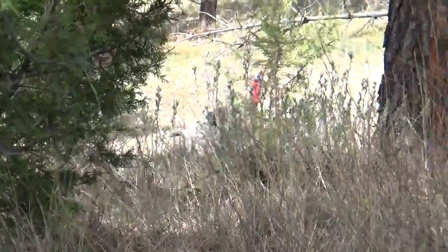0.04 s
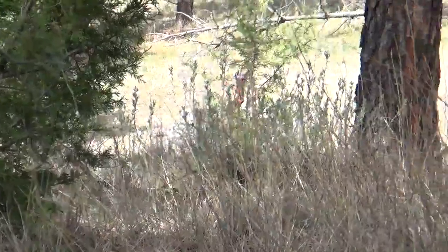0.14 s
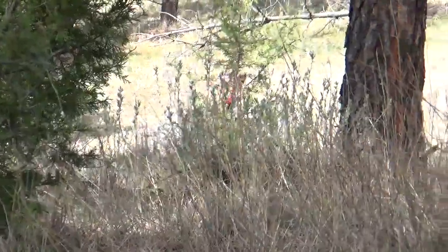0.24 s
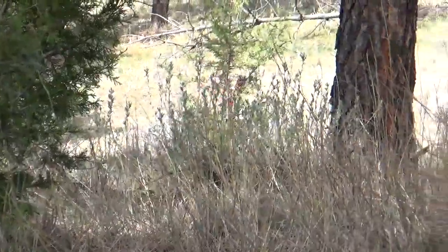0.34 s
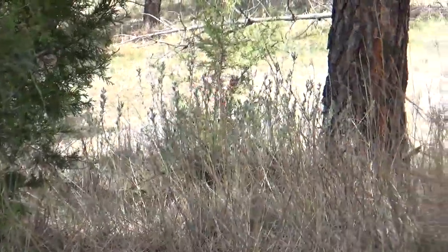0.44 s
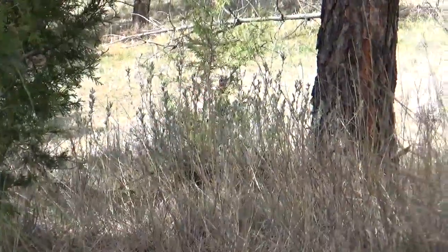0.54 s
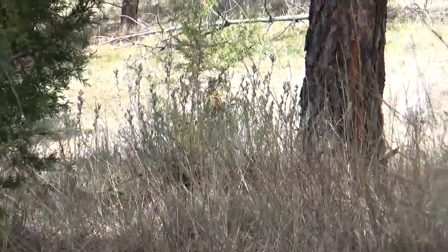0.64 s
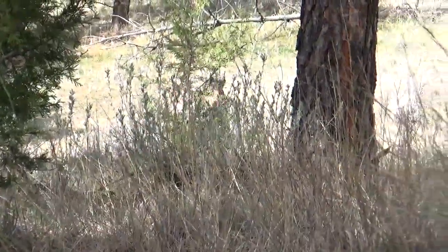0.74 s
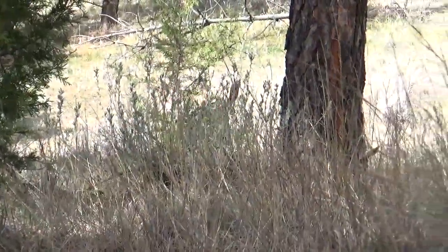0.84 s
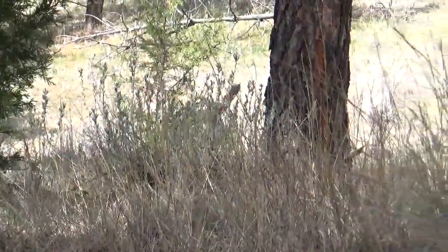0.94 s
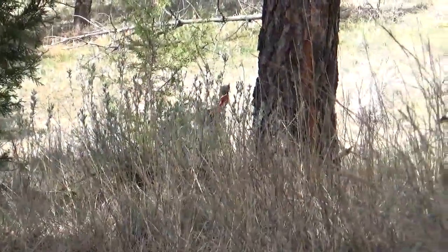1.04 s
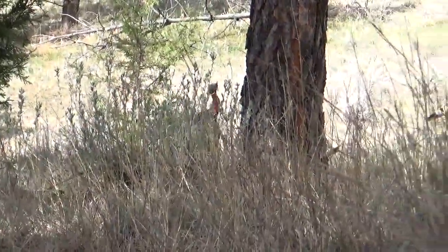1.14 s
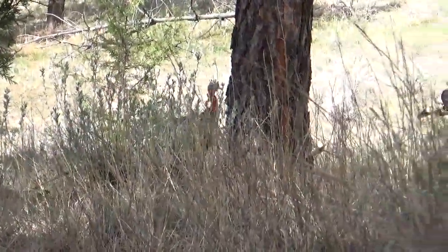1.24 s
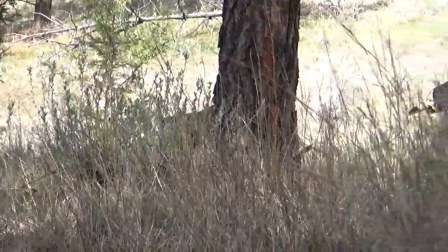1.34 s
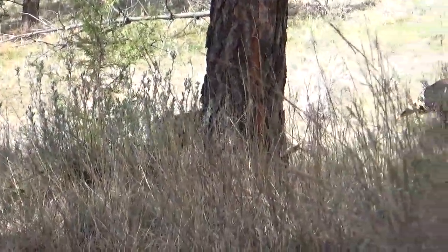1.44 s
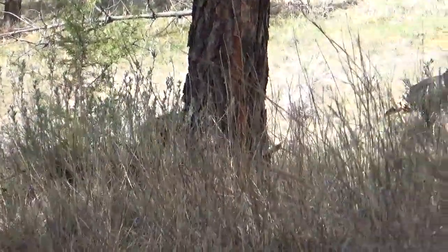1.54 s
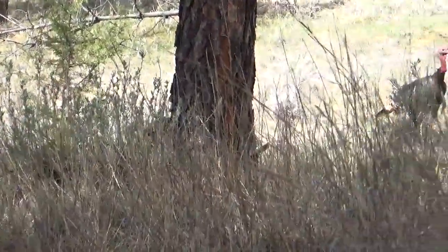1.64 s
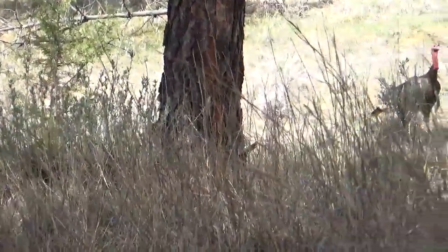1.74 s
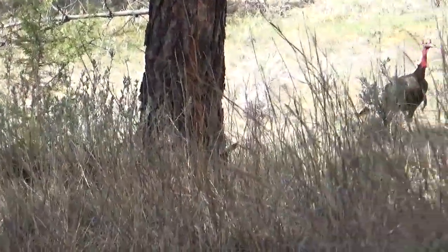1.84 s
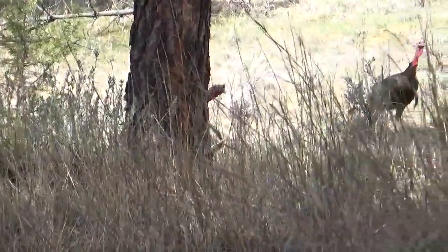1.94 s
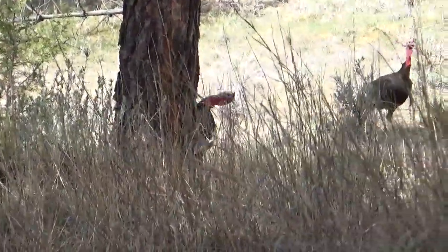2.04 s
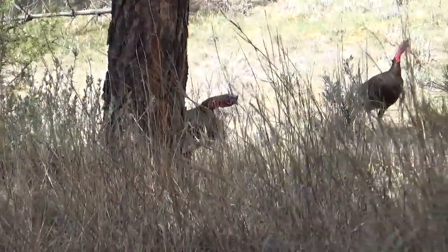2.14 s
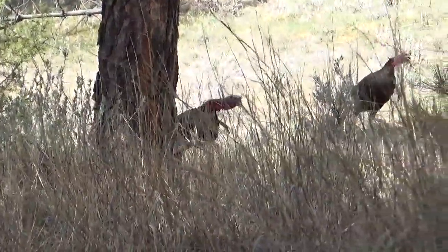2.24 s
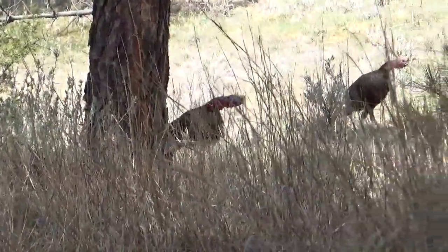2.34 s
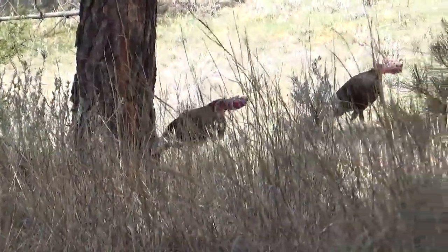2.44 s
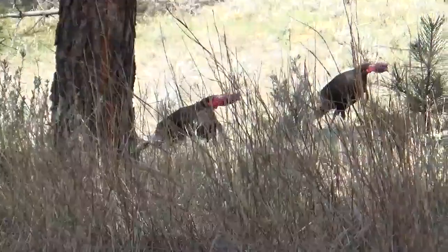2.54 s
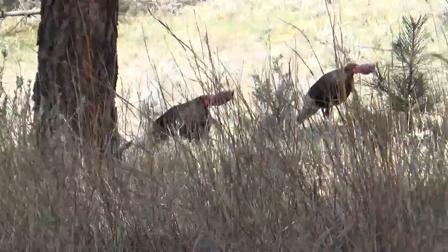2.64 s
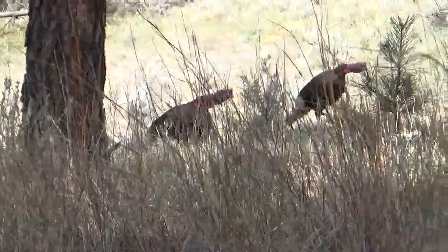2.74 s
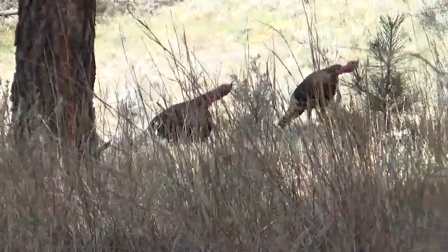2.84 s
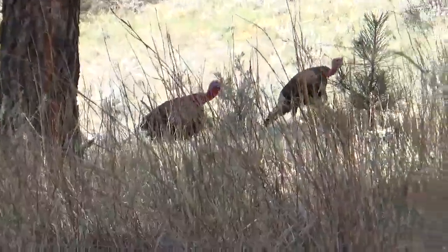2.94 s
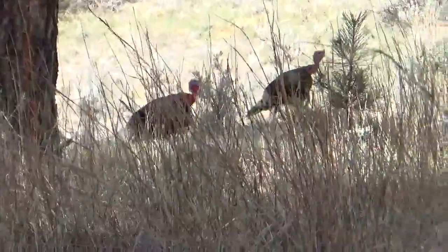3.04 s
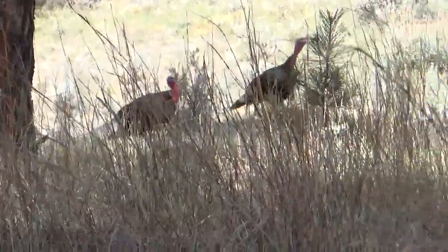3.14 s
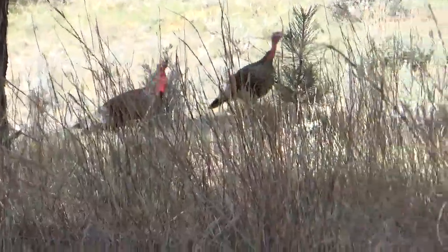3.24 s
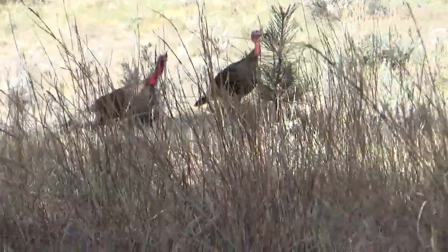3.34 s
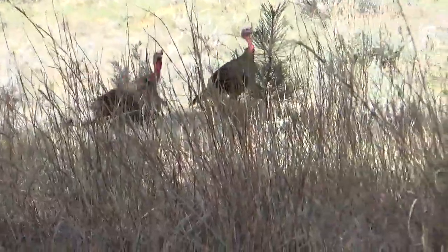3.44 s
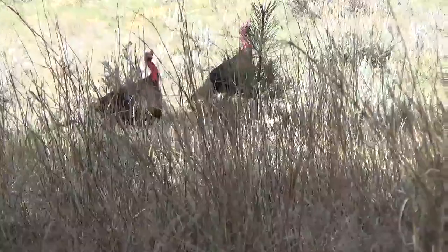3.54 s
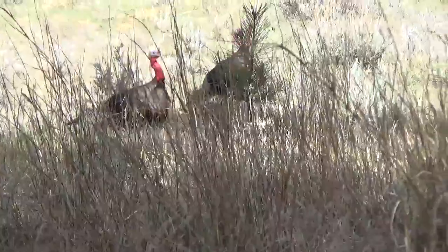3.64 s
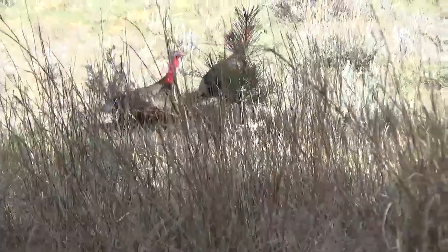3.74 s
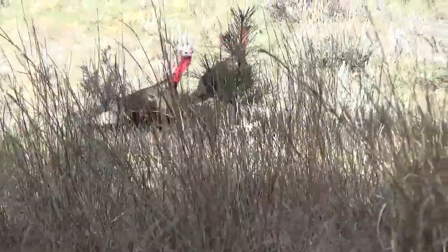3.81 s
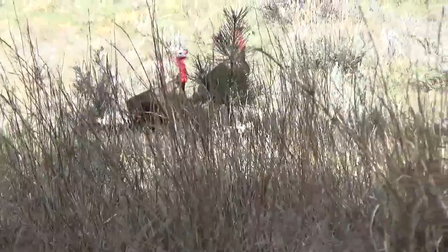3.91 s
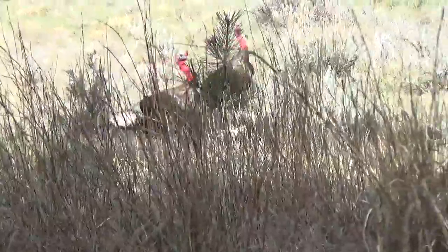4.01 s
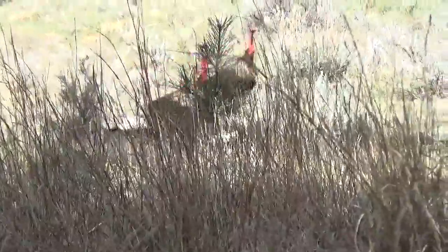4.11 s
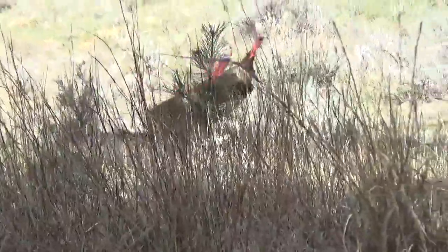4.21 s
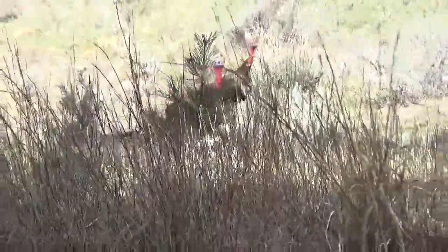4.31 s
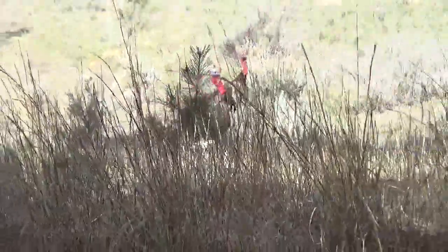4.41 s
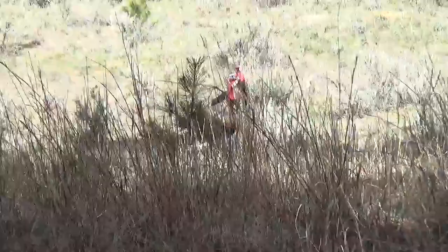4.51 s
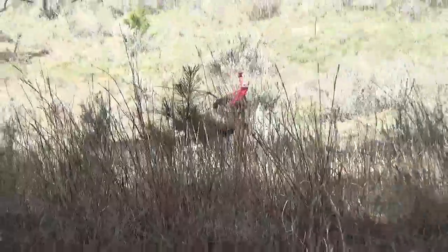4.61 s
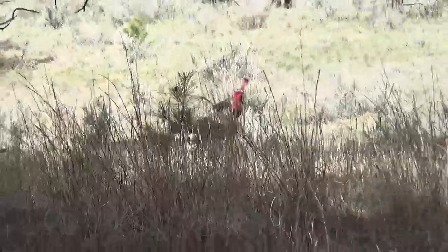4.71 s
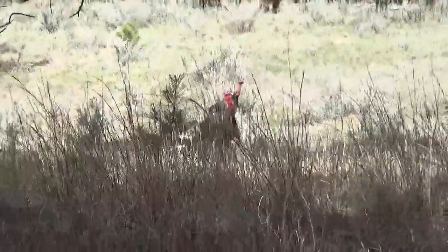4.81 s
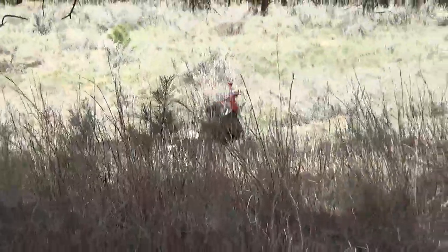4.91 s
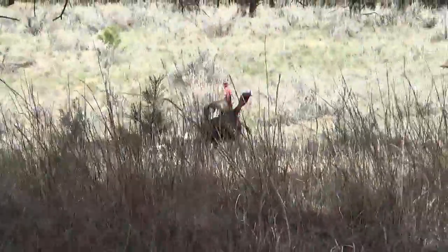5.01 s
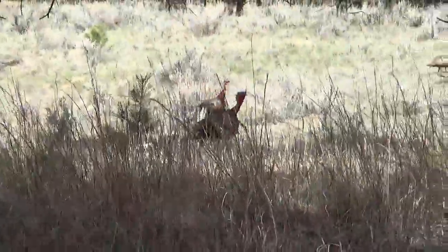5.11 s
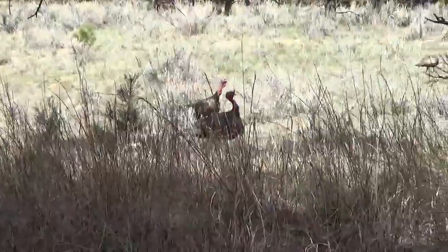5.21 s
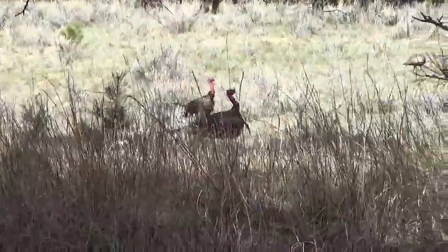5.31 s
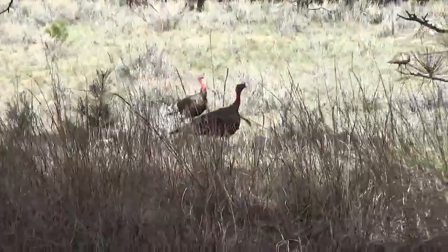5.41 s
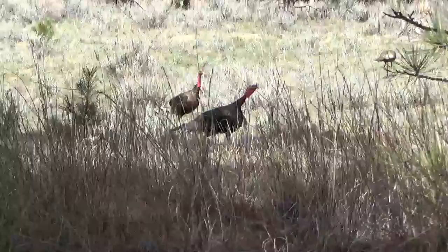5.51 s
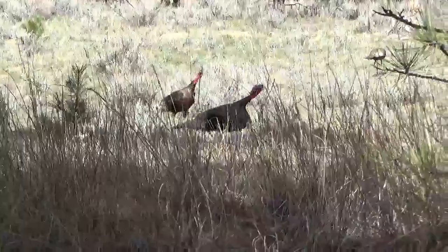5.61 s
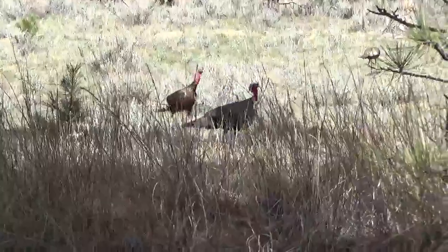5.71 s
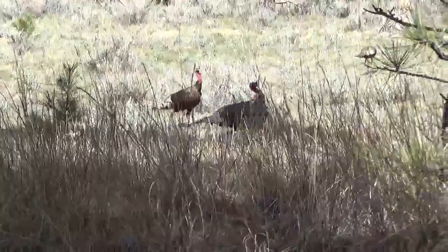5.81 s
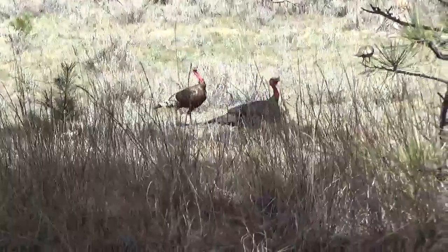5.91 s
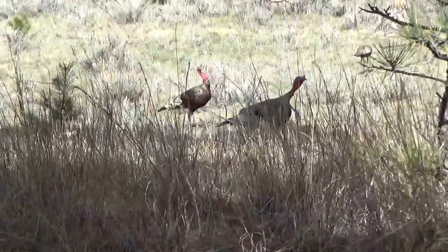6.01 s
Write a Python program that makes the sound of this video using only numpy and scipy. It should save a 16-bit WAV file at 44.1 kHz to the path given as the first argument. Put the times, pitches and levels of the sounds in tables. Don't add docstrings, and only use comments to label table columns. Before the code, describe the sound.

A handheld camera microphone in open pine woodland hears a soft, low-to-mid hush of air, a thin buzzing lens-motor whine near 2.9 kHz, and muffled finger thumps with slight rumble. A plastic tap clicks at 0.85 s, with tiny rustles around it. At about 1.6 s a turkey off to one side gives soft short yelps, repeated louder near 1.85 s. From 1.9 s a lower tom begins gobbling, joined at 2.0 s by a higher one; their rapid, rattling notes overlap, peaking in a piercing cry at 2.2 s, with faint chest booms beneath. A sharp tap lands at 2.5 s. The gobbles thin and sink, ending by 3.0 s, while echoes linger from trunks and hillside. Then quiet air and light rustling remain. Around 4.1 s there are bumps and the whine stops; a cluster of clicks and rustles comes at 5.0-5.3 s, and the whine resumes at 5.35 s until the end.

```python
import sys
import numpy as np
from scipy import signal
from scipy.io import wavfile
from scipy.ndimage import uniform_filter1d

SR = 44100
rng = np.random.default_rng(int(sys.argv[2]) if len(sys.argv) > 2 else 0)


def convert_level_to_amplitude(level_db):
    exponent = np.asarray(level_db, float) / 20
    return 10 ** exponent


def unload_audio(sound):
    columns = np.transpose(np.atleast_2d(sound))
    steps = np.round(np.clip(columns, -1, 1) * 32767)
    wavfile.write(sys.argv[1], SR, steps.astype(np.int16))


N = 267246

# (time [s], peak level [dB], pitch [Hz])
THUMPS = [(0.051, -49, 45), (0.22, -41, 56.4), (0.319, -43.5, 52), (0.629, -39, 49), (0.713, -49, 57),
          (0.793, -42, 51.6), (1.265, -40, 64), (1.77, -57, 40), (2.476, -37.5, 38), (3.946, -45, 61.3),
          (4.039, -48, 40.4), (4.098, -43, 54.6), (4.139, -44, 48.4), (4.164, -60, 53.8), (4.191, -33, 79),
          (4.732, -54, 95), (4.97, -51, 45), (5.101, -58, 95), (5.2, -54, 40), (5.64, -57, 36),
          (5.878, -47, 55), (6, -45.5, 44.4)]


def evened(x):
    return x / np.sqrt(np.mean(x ** 2) + 1e-20)


def read(points, hz):
    f, value = np.transpose(points)
    return np.interp(np.log(hz + 1), np.log(f + 1), value)


def add(mix, s, sound):
    part = mix[round(s * SR):][:len(sound)]
    part += sound[:len(part)]


def noise(length):
    return rng.standard_normal((length // 8192 + 1) * 8192)[:length]


def resonate(x, hz, width):
    pole = np.exp((2j * np.pi * hz - np.pi * width) / SR)
    return 2 * signal.lfilter([1 - abs(pole)], [1, -pole], x + 0j).real


def resonate_twice(x, hz, width):
    return resonate(resonate(x, hz, width), hz, width)


def wander(length, hz):
    return evened(resonate_twice(noise(length + 999), 0, hz)[999:])


def placed(x, pan_db, lean):
    side = lean * np.gradient(resonate(x, 1800, 1300))
    return np.array([convert_level_to_amplitude(pan_db / 2) * x + side, convert_level_to_amplitude(-pan_db / 2) * x - side])


def woodland_air():
    # (frequency [Hz], density [dB per Hz])
    hush_spectrum = [(12, -49), (70, -17.5), (142, -3.5), (298, -2.5), (560, 1.5), (930, -4.5), (2500, -17),
                     (10500, -25.5)]
    # (frequency [Hz], left-right likeness [-1 to 1])
    port_likeness = [(60, 1), (170, 0.91), (490, 0.93), (1400, 0.59), (3990, 0.22), (11400, 0.86)]
    frames, hz = N // 256 + 5, np.fft.rfftfreq(1024, 1 / SR)
    a, b, c, d, patches = rng.standard_normal((frames, 513, 5)).T
    patches = uniform_filter1d(patches, size=14, axis=0)
    patches = evened(uniform_filter1d(patches, size=12, axis=1))
    same = np.clip(read(port_likeness, hz), -1, 1)[:, None]
    left = a + 1j * b
    right = same * left + np.sqrt(1 - same ** 2) * (c + 1j * d)
    z = np.array([left, right]) * convert_level_to_amplitude(read(hush_spectrum, hz)[:, None] + 1.23 * patches)
    return convert_level_to_amplitude(-48.5) * evened(signal.istft(z, nperseg=1024, noverlap=768)[1][:, :N])


def rumble():
    # (time [s], level [dB])
    grip_points = [(0, -62), (.45, -62.5), (.9, -57), (1.15, -71), (1.6, -67), (1.78, -64), (1.9, -68),
                   (2.35, -60), (2.7, -61), (3.0, -76), (3.4, -64), (3.5, -58), (3.78, -62.5), (3.87, -73),
                   (4.1, -59), (4.5, -68.5), (5.6, -67), (6.06, -64)]
    # (frequency [Hz], level [dB], gust depth [dB])
    swing_bands = [(42.4, 1, 3), (95, -0.5, 4.5)]
    shake_db, shake_s = -8.5, 0.024
    t, out = np.arange(N) / SR, np.zeros(N)
    grip = convert_level_to_amplitude(np.interp(t, *np.transpose(grip_points)))
    for hz, db, gust_db in swing_bands:
        turns = np.cumsum(hz * (1 + .45 * wander(N, 45))) / SR
        swing = np.sin(2 * np.pi * turns) * convert_level_to_amplitude(1.8 * wander(N, 36))
        push = grip * convert_level_to_amplitude(db + gust_db * wander(N, 13))
        for s, thump_db, thump_hz in THUMPS:
            near = convert_level_to_amplitude(thump_db + shake_db - 6.3 * abs(np.log2(thump_hz / hz)))
            add(push, max(s - shake_s, 0), near * np.hanning(round(3 * shake_s * SR)))
        out += push * swing
    late_opposed = 0.16 * np.array([[1], [-1]]) * np.roll(out, 300)
    return placed(out, .3, lean=0) + late_opposed


def lens_motor():
    # (time [s], level [dB])
    motor_level = [
        (0, -54.5),
        (4.13, -54),
        (4.16, -85),
        (5.3, -85),
        (5.35, -56),
        (6.06, -58),
    ]
    whine_hz, frame_rate_hz, first_frame_s = 2870, 29.97, .0055
    t = np.arange(N) / SR
    frame, place = np.divmod((t - first_frame_s) * frame_rate_hz + 1, 1)
    step_db = 1.1 * rng.standard_normal(200)[frame.astype(int)]
    since = place / frame_rate_hz
    burst = np.minimum(since / 0.0074, 1) * convert_level_to_amplitude(-np.maximum(since - .006, 0) * 3600)
    level = convert_level_to_amplitude(np.interp(t, *np.transpose(motor_level)) + step_db)
    return level * burst * np.sin(2 * np.pi * whine_hz * t)


def finger_thumps():
    out = np.zeros(N)
    push_s = 0.039
    for s, db, hz in THUMPS:
        turns = np.arange(0, max(hz * push_s, 2.2), hz / SR)
        add(out, s - .008, -convert_level_to_amplitude(db) * np.sin(2 * np.pi * turns) * np.hanning(len(turns)))
    return out


def rustles():
    # (time [s], length [s], rms level [dB], centre [Hz])
    grain_bursts = [(0.59, 0.04, -72, 6000), (0.636, 0.017, -58, 9500), (0.845, 0.045, -66, 5000),
                    (0.931, 0.035, -58.5, 3600), (1.18, 0.016, -62.5, 5000), (1.45, 0.0029, -48, 8700),
                    (1.476, 0.058, -61, 6500), (3.172, 0.011, -53, 6100), (4.084, 0.053, -59, 4200),
                    (4.262, 0.0055, -50.5, 2900), (4.689, 0.1, -61.5, 4180), (4.81, 0.043, -55.5, 3500),
                    (4.862, 0.0052, -57, 3300), (5.08, 0.012, -62, 5600), (5.011, 0.19, -65, 3300),
                    (5.291, 0.071, -58, 4600), (5.348, 0.14, -60, 3500), (5.507, 0.015, -58, 3700),
                    (5.59, .03, -69, 5000), (4.988, 0.013, -54, 3000), (5.001, 0.0055, -40.5, 5900),
                    (5.002, 0.009, -47, 1880), (5.276, 0.021, -52, 1480), (3.946, 0.044, -52.5, 1350),
                    (3.046, 0.34, -61.5, 3830), (4.301, 0.98, -67, 3350), (3.195, 0.06, -56.5, 2100)]
    out = np.zeros(N)
    for s, length_s, db, hz in grain_bursts:
        length = round(length_s * SR)
        grains = noise(length) * convert_level_to_amplitude(3.8 * wander(length, 520))
        brush = evened(resonate_twice(grains, hz, width=1.2 * hz))
        add(out, s, convert_level_to_amplitude(db) * brush * signal.windows.tukey(length, .6))
    return out


def shell_taps():
    # (time [s], peak level [dB], main mode [Hz], ring t60 [s], tick level [dB])
    tap_events = [(0.85, -24.5, 303, 0.007, -17), (0.8505, -37, 950, 0.024, -14),
                  (2.5259, -21, 1490, 0.0047, -7.5), (3.962, -38, 1000, 0.016, -22),
                  (3.982, -33.5, 350, 0.0076, -22), (4.071, -38, 280, 0.015, -5),
                  (4.234, -35, 500, 0.014, -23), (4.977, -35.5, 1670, 0.012, -15),
                  (4.977, -40, 950, 0.015, -20), (5.0026, -26.5, 904, 0.022, -6),
                  (5.005, -37.5, 1710, 0.019, -20), (5.079, -45, 4200, .006, -6),
                  (5.278, -39, 1600, .008, -14), (5.2855, -37.5, 1750, 0.0074, -14),
                  (5.29, -43, 846, 0.018, -15), (5.812, -38, 800, 0.0065, -16)]
    out = np.zeros(N)
    t = np.arange(2500) / SR
    for s, db, low_hz, t60, tick_db in tap_events:
        high_hz = np.clip(2.27 * low_hz, 950, 2100)
        high_mode = 0.37 * np.sin(2 * np.pi * high_hz * t) * convert_level_to_amplitude(-25 * t / t60)
        ring = np.sin(2 * np.pi * low_hz * t) + high_mode
        ring *= convert_level_to_amplitude(-60 * (t / t60) ** 2) * np.minimum(t / 0.0014, 1)
        tick = convert_level_to_amplitude(tick_db - 60 * t / 0.0026) * rng.standard_normal(len(t))
        add(out, s, convert_level_to_amplitude(db) * (ring + tick))
    return out


def voice(notes, throat, breath_db, chest_db, sag, sign=-1, arch=.03):
    out = np.zeros(N)
    for (s, length, first_hz, effort_db, rough), later in zip(notes, notes[1:] + [(np.inf, 0, 0)]):
        joined = later[0] - s - length < .008
        last_hz = later[2] if joined else first_hz * (1 - sag)
        t = np.linspace(0, 1, round(length * SR))
        rough = np.clip(rough, 0, 1)
        hz = (first_hz + (last_hz - first_hz) * t) * (1 + .08 * rough * wander(len(t), 120))
        turns = np.cumsum(hz * (1 + arch * (1 / 3 - (2 * t - 1) ** 2))) / SR
        blur_rad = 1.5 * rough ** .8 * np.clip(np.arange(15) * first_hz / 1900 - 1, .15, 2)
        pulses = np.zeros(len(t))
        for k in range(1, 15):
            flicker = convert_level_to_amplitude(min(2 + 2.6 * k, 14) * rough * wander(len(t), 66))
            phase = 2 * np.pi * k * turns + blur_rad[k] * wander(len(t), 230)
            pulses += flicker * np.cos(phase)
        puffs = evened((0.16 + np.exp(-(turns % 1) / 0.38)) * noise(len(t)))
        gate = np.sin(np.pi / 2 * np.clip(np.minimum(t / 0.26, (1 - t) / 0.22), 0, 1)) ** 2
        swell = convert_level_to_amplitude(3.5 * rough * wander(len(t), 90)) * gate
        drive = np.pad((evened(pulses) + 2.2 * rough * puffs) * swell, (0, 400))
        rung = 0.018 * drive
        for k, (f, width, db) in enumerate(throat):
            rung += sign ** k * convert_level_to_amplitude(db) * resonate_twice(drive, f, width)
        add(out, s, convert_level_to_amplitude(effort_db) * evened(rung))
        breath = resonate_twice(puffs * swell, 10600, 2700)
        add(out, s, convert_level_to_amplitude(effort_db + breath_db) * rough * evened(breath))
        chest = resonate_twice(puffs * swell, 174, 170)
        add(out, s, convert_level_to_amplitude(effort_db + chest_db) * evened(chest))
    return out


def third_bird():
    # (time [s], length [s], pitch [Hz], effort [dB], roughness [0-1])
    yelp_notes = [
        (1.556, 0.036, 570, -52, 0.3),
        (1.584, .036, 590, -51.5, 0.15),
        (1.818, 0.026, 870, -56, 0.2),
        (1.836, 0.042, 655, -48.5, 0.2),
        (1.872, 0.033, 655, -48.5, 0.18),
    ]
    # (frequency [Hz], width [Hz], level [dB])
    yelp_throat = [(596, 130, 5), (1420, 920, 8.5), (2000, 1170, 2.5), (3300, 590, 0.5)]
    return voice(yelp_notes, yelp_throat, breath_db=-30, chest_db=-41, sag=-0.223, arch=0)


def low_tom():
    # (time [s], length [s], pitch [Hz], effort [dB], roughness [0-1])
    starting = [
        (1.916, 0.017, 500, -44, 0.72),
        (1.925, 0.027, 520, -36.5, 0.33),
        (1.956, 0.017, 510, -50, 0.3),
        (1.97, 0.016, 650, -43, 0.3),
    ]
    # (time [s], length [s], pitch [Hz], effort [dB], roughness [0-1])
    gobble = [(1.998, 0.054, 465.3, -36.5, 0.64), (2.052, 0.016, 338, -46, 0.27),
              (2.064, 0.027, 409, -38.5, 0.23), (2.1, 0.1, 524.8, -42.5, 0.25),
              (2.285, 0.056, 509, -39.5, 0.23), (2.333, 0.03, 522, -36, 0.2), (2.36, .022, 511, -39, .5),
              (2.385, 0.053, 515, -41.5, 0.86), (2.46, 0.023, 500, -32.5, 0.76),
              (2.503, 0.023, 503, -33.5, 0.3), (2.57, 0.048, 520, -38, 0.43),
              (2.579, 0.015, 528, -31.5, 0.12), (2.6, 0.08, 509, -40, 0.67)]
    # (time [s], length [s], pitch [Hz], effort [dB], roughness [0-1])
    fading = [(2.702, 0.024, 450, -42, 0.15), (2.735, 0.023, 499, -40.5, 0.13), (2.75, 0.016, 425, -45, .2),
              (2.768, 0.03, 478, -43.5, 0.13), (2.796, 0.0108, 432, -47.5, 0.42),
              (2.817, 0.021, 449.6, -38.5, 0.29), (2.835, 0.027, 445, -40, 0.55),
              (2.893, 0.013, 427, -46, 0.18), (2.927, 0.025, 490, -44, 0.051),
              (2.953, 0.0163, 431, -45, 0.24), (2.986, 0.0157, 426, -40, 0.074),
              (3.008, 0.026, 513.4, -46, 0.1)]
    # (frequency [Hz], width [Hz], level [dB])
    starting_throat = [(520, 420, -6.5), (1080, 300, 6), (1560, 840, -4), (2090, 530, 6), (3300, 1700, -12),
                       (4730, 1900, -12.5)]
    # (frequency [Hz], width [Hz], level [dB])
    gobble_throat = [(500, 190, -6), (950, 310, 4.5), (1750, 310, -26), (2100, 570, -5), (3120, 510, -7),
                     (3300, 750, -5.5), (4470, 3200, -21), (6500, 730, -17.5)]
    # (frequency [Hz], width [Hz], level [dB])
    fading_throat = [(450, 950, -9), (900, 410, 6), (1750, 350, -48), (2270, 550, -7), (3060, 290, -2.5),
                     (3520, 350, -2.5), (4630, 1450, -11), (6500, 580, -20)]
    out = voice(starting, starting_throat, breath_db=-22, chest_db=-27, sag=.02)
    out += voice(gobble, gobble_throat, breath_db=-16.5, chest_db=-20, sag=0.023)
    out += voice(fading, fading_throat, breath_db=-10.5, chest_db=-16.5, sag=0.013, arch=0)
    return out


def high_tom():
    # (time [s], length [s], pitch [Hz], effort [dB], roughness [0-1])
    opening = [
        (1.984, 0.023, 628, -32.5, 0.3),
        (1.999, 0.03, 653, -37.5, 0.49),
        (2.025, 0.033, 704.7, -33.5, 0.36),
        (2.062, 0.022, 671, -54, 1),
        (2.085, 0.027, 645, -42.5, 0.3),
        (2.132, 0.029, 621, -41, 1),
    ]
    # (time [s], length [s], pitch [Hz], effort [dB], roughness [0-1])
    gobble = [(2.098, 0.0097, 656, -37.5, 0.21), (2.138, 0.033, 613, -40.5, 0.19),
              (2.255, 0.019, 633.5, -32, 0.46), (2.318, 0.028, 591, -34.5, 0.32),
              (2.375, 0.045, 571, -36, 0.51), (2.418, 0.032, 575.5, -36, 0.26),
              (2.44, 0.024, 627, -32.5, 0.17), (2.46, 0.036, 666, -36.5, 0.46),
              (2.52, 0.026, 623, -32, 0.25), (2.613, 0.024, 531, -35, 0.06),
              (2.632, 0.021, 596, -32, 0.096), (2.655, 0.023, 630, -34, 0.5)]
    # (time [s], length [s], pitch [Hz], effort [dB], roughness [0-1])
    cry = [
        (2.177, .014, 520, -31.5, .12),
        (2.183, .026, 586, -25.5, .02),
        (2.199, .061, 580, -30.5, .3),
    ]
    # (time [s], length [s], pitch [Hz], effort [dB], roughness [0-1])
    closing = [
        (2.712, 0.026, 563.4, -34.5, 0.35),
        (2.742, 0.024, 547, -37, 0.14),
        (2.84, 0.014, 593, -41, .4),
        (2.85, 0.013, 592, -37.5, 0.28),
        (2.91, 0.019, 540, -37, 0.3),
        (2.93, 0.053, 507, -51, 0.32),
    ]
    # (frequency [Hz], width [Hz], level [dB])
    opening_throat = [(650, 480, -8.5), (1310, 780, 2), (2000, 1500, -10.5), (2900, 160, -1.5),
                      (3460, 190, 1), (4420, 1200, -8), (6300, 620, -27)]
    # (frequency [Hz], width [Hz], level [dB])
    gobble_throat = [(573, 210, 3), (1190, 920, -5), (1810, 340, 4.5), (2200, 590, -2), (3200, 680, -6),
                     (4800, 1060, -5.5), (6500, 550, -15)]
    # (frequency [Hz], width [Hz], level [dB])
    cry_throat = [(596, 1300, -11), (1310, 1400, 9), (1640, 1200, 17.5), (2340, 960, 9), (3500, 420, 19.5),
                  (4000, 1250, 14.5), (6300, 2250, -45)]
    # (frequency [Hz], width [Hz], level [dB])
    closing_throat = [(540, 320, -3), (1130, 450, -48), (1810, 240, -0.5), (3500, 4500, -16.5),
                      (5000, 4400, -21)]
    out = voice(opening, opening_throat, breath_db=-6, chest_db=-26, sag=0.0085)
    out += voice(gobble, gobble_throat, breath_db=-13, chest_db=-29, sag=.045)
    out += voice(cry, cry_throat, breath_db=-1, chest_db=-36, sag=-0.092, sign=0.84, arch=0)
    out += voice(closing, closing_throat, breath_db=-11, chest_db=-28, sag=0.028)
    return out


def chest_booms():
    # (time [s], length [s], pitch [Hz], level [dB])
    hums = [
        (2.02, 0.069, 206, -49),
        (2.51, 0.037, 132, -44.5),
        (2.78, 0.05, 186, -44),
        (2.88, 0.061, 172, -49.5),
    ]
    out = np.zeros(N)
    for s, length, hz, db in hums:
        t = np.arange(0, length, 1 / SR)
        add(out, s, convert_level_to_amplitude(db + 3.5) * np.sin(2 * np.pi * hz * t) * np.hanning(len(t)))
    shudder = evened(resonate_twice(noise(round(1.16 * SR)), hz=83, width=29))
    add(out, 2.0, convert_level_to_amplitude(-60) * shudder * signal.windows.tukey(len(shudder), .3))
    return out


def scattered(x, decay):
    taps = np.zeros((2, SR))
    at = np.arange(200, SR - 20, 20) + rng.integers(0, 20, (2, (SR - 201) // 20))
    np.put_along_axis(taps, at, rng.choice([-1., 1.], at.shape), 1)
    taps[1] = 0.67 * taps[0] + .5 * taps[1]
    hz, t, z = signal.stft(taps, SR, nperseg=256)
    fade = convert_level_to_amplitude(-60 * t / read(decay, hz)[:, None])
    tail = signal.istft(z * fade, SR, nperseg=256)[1]
    return signal.fftconvolve(x[None], tail / np.linalg.norm(tail[0]), axes=1)[:, :N]


def echoes(calls):
    # (frequency [Hz], t60 [s])
    trunk_decay = [(300, 0.1), (1000, 0.16), (3000, 0.13), (9000, 0.056)]
    # (frequency [Hz], t60 [s])
    hillside_decay = [(300, 0.58), (1000, 1.76), (3000, 0.71), (9000, 0.52)]
    return convert_level_to_amplitude(-10.5) * scattered(calls, trunk_decay) + convert_level_to_amplitude(-9.5) * scattered(calls, hillside_decay)


def scene():
    camera = rumble() + placed(lens_motor(), -1.1, lean=0.33)
    hands = finger_thumps() + rustles() + shell_taps()
    yelps, low, high = third_bird(), low_tom(), high_tom()
    birds = placed(yelps, 3.0, lean=0.41)
    birds += placed(low + chest_booms(), 0.18, lean=0.4)
    birds += placed(high, -0.09, lean=-0.79)
    return woodland_air() + camera + hands + birds + echoes(yelps + low + high)


def top_cut(x):
    return signal.sosfilt(signal.butter(12, 11980, fs=SR, output="sos"), x)


def record(dry):
    edge = signal.firwin(511, 11080, window=("kaiser", 9), fs=SR)
    mix = signal.oaconvolve(dry, edge[None], "same")
    return top_cut(mix)


dry = scene()
out = record(dry)
unload_audio(out)
```